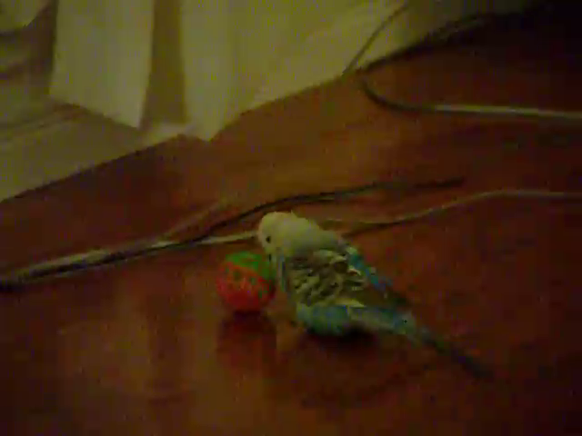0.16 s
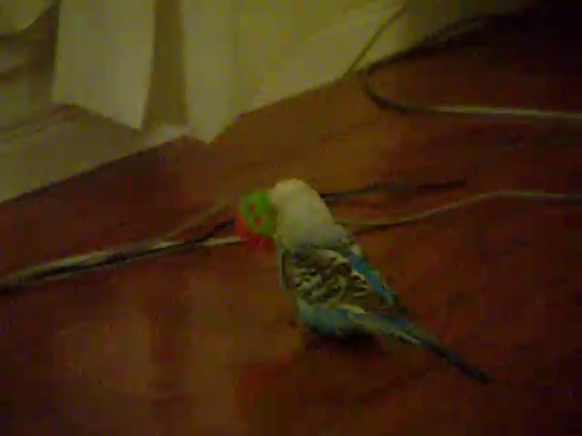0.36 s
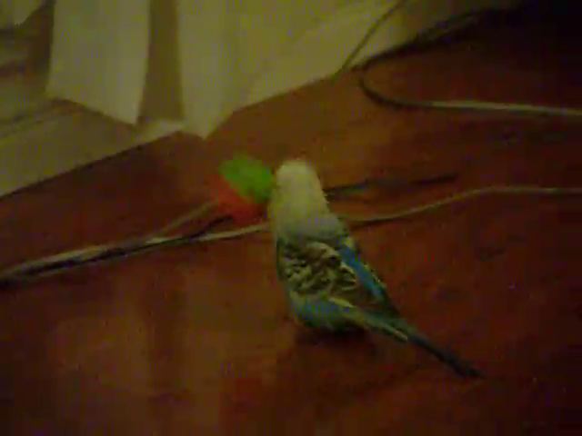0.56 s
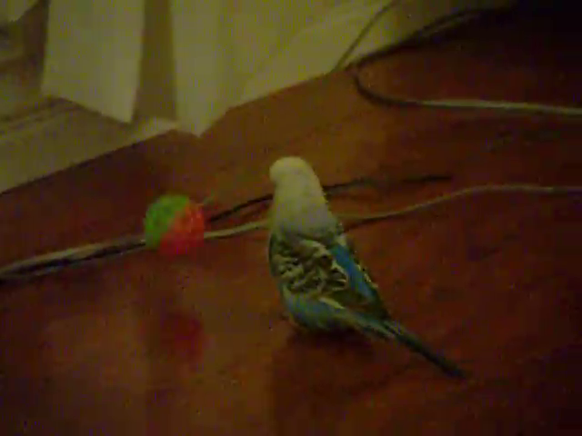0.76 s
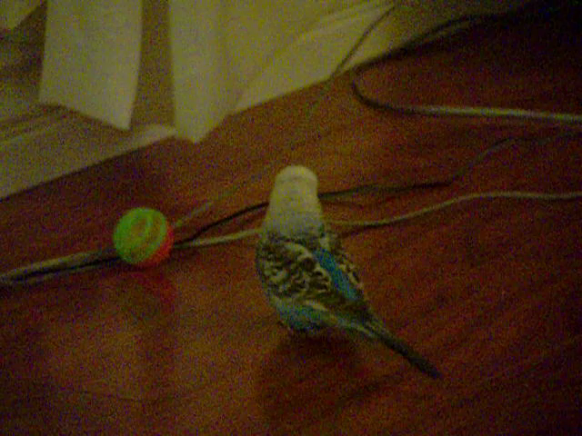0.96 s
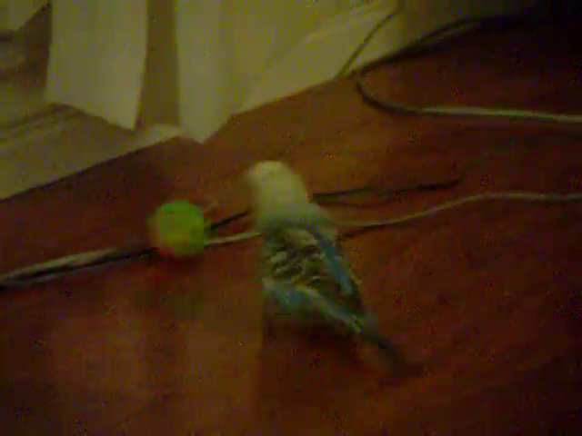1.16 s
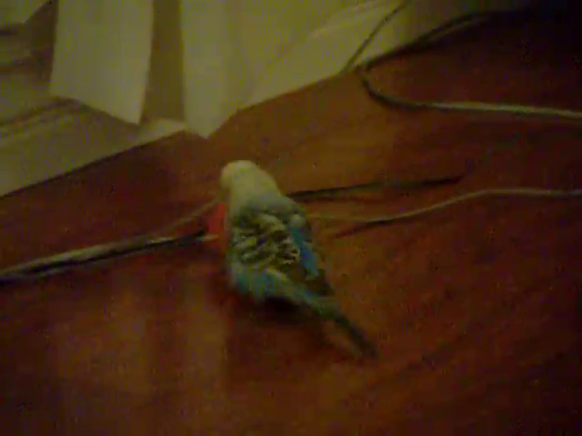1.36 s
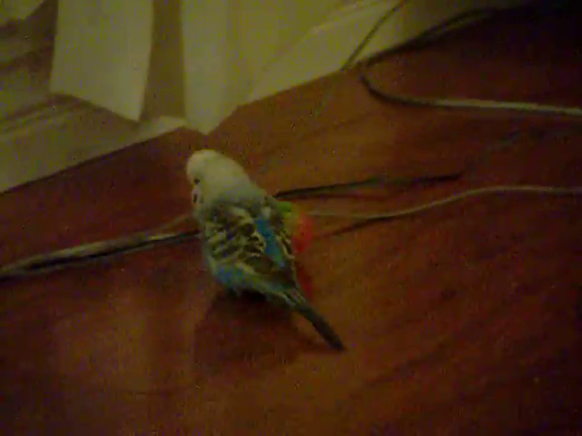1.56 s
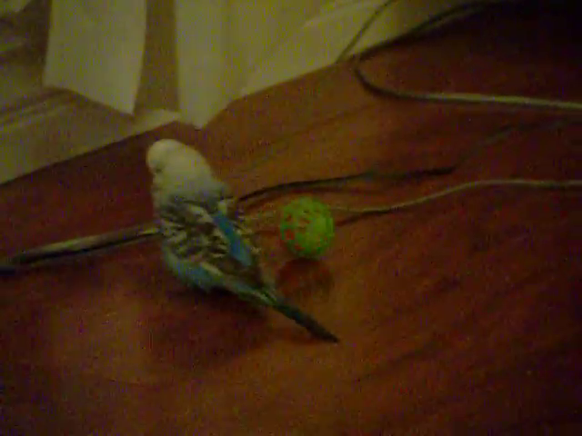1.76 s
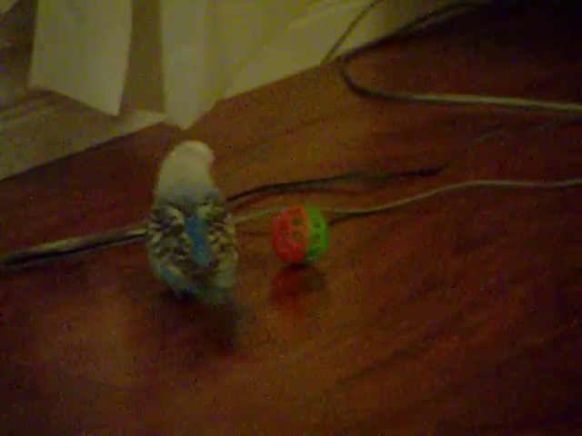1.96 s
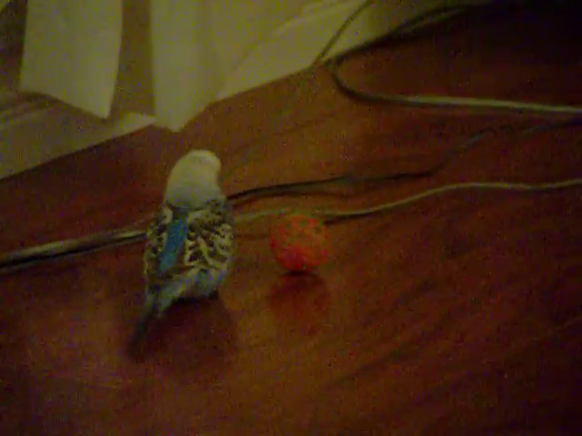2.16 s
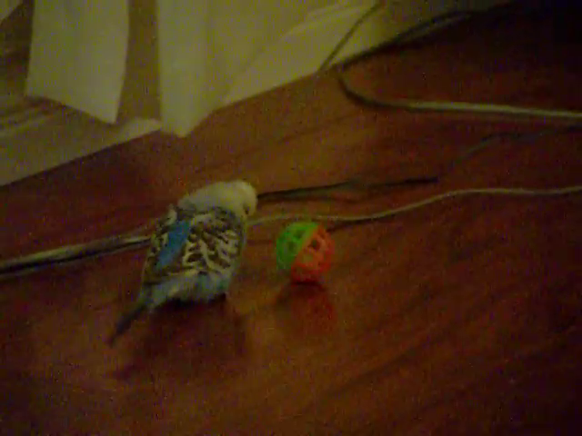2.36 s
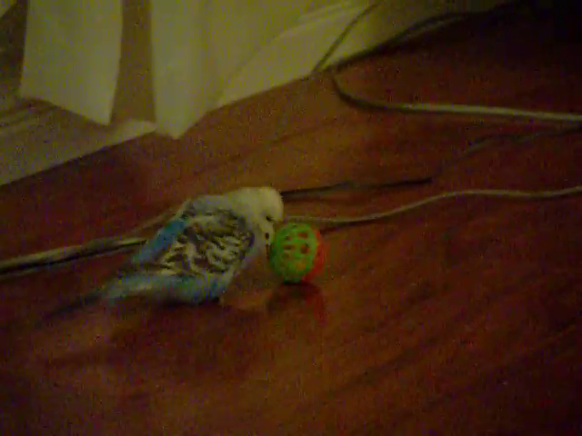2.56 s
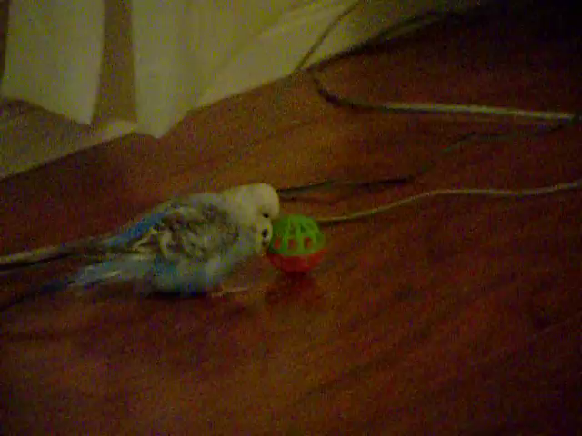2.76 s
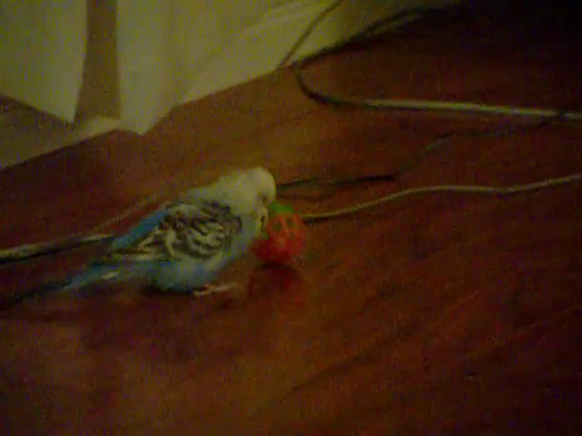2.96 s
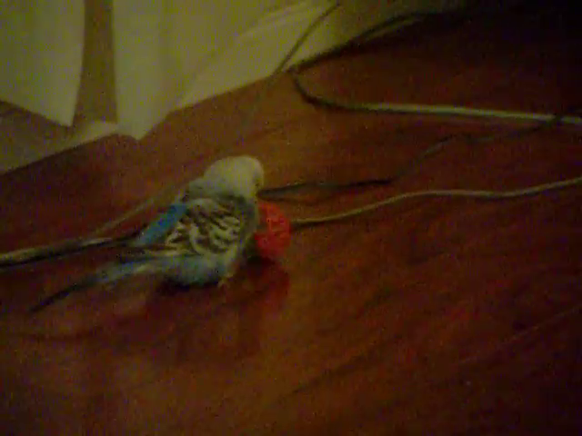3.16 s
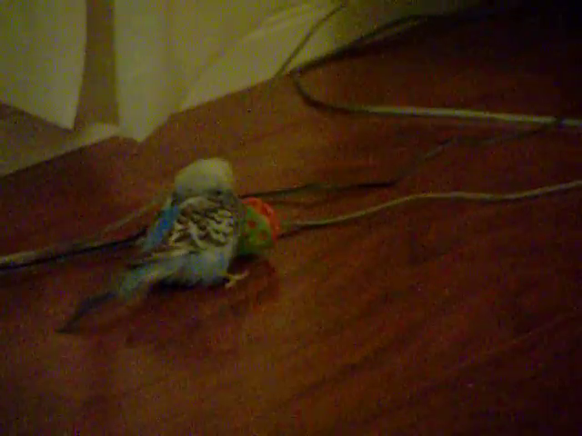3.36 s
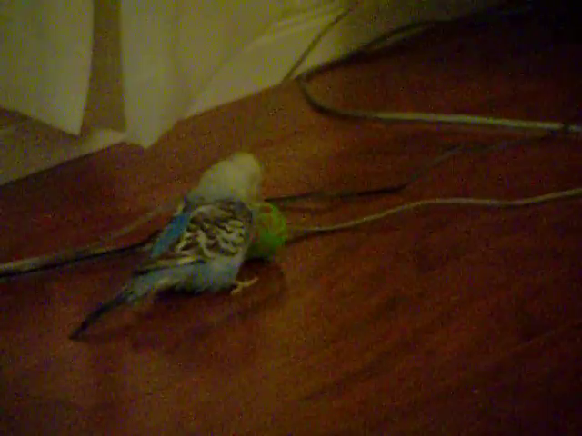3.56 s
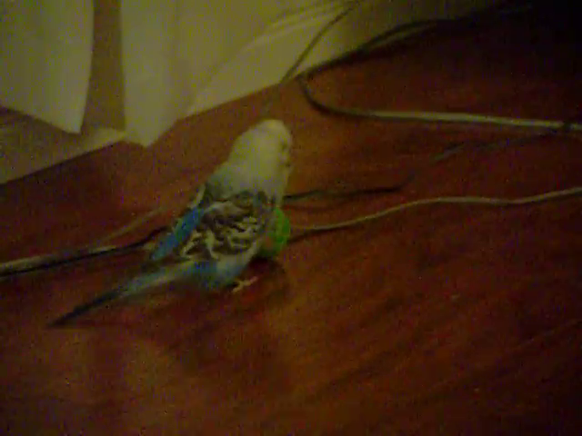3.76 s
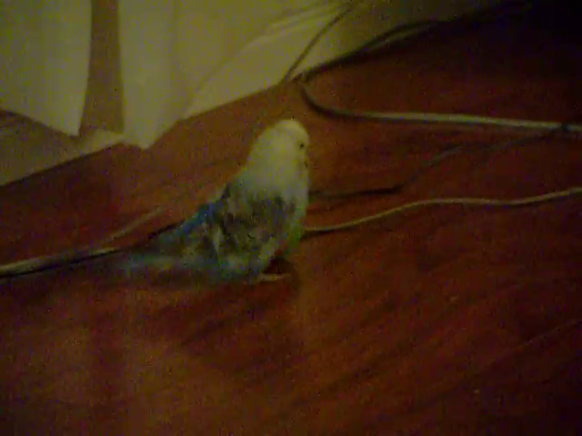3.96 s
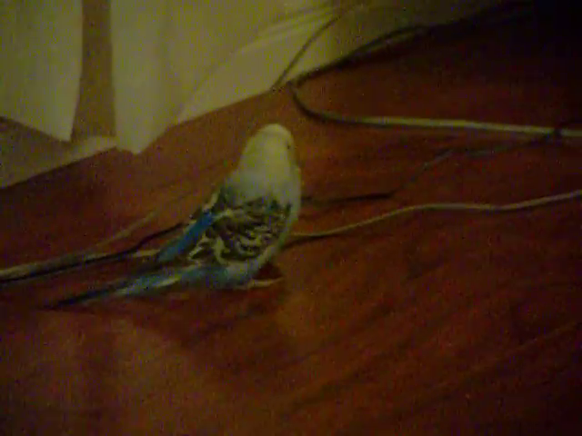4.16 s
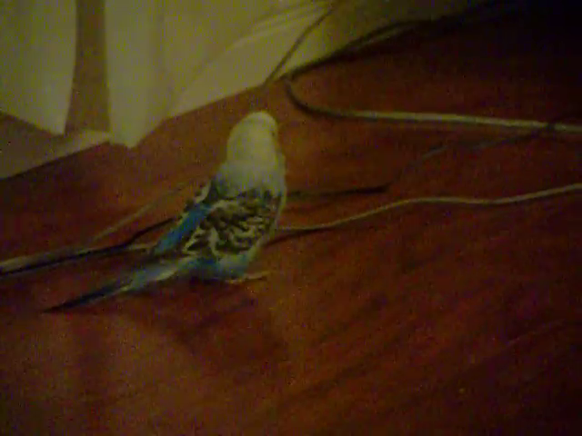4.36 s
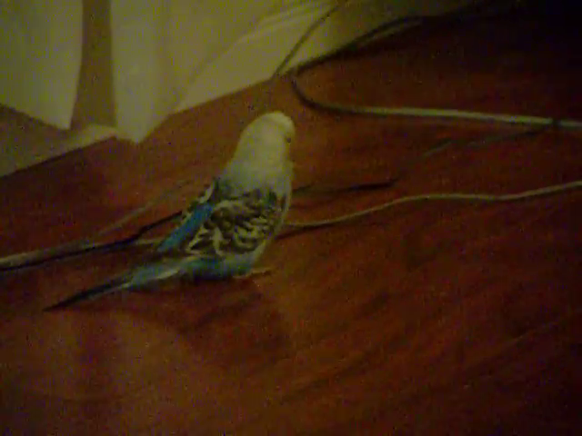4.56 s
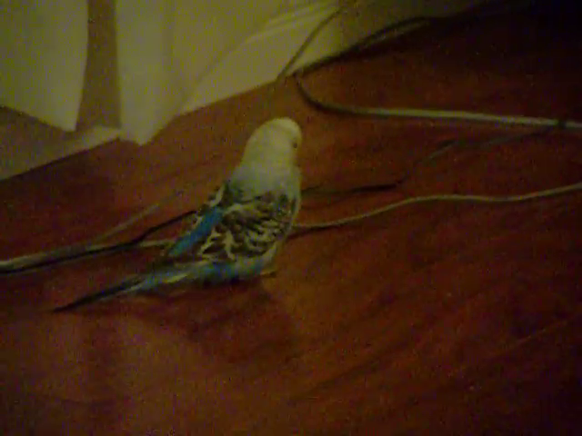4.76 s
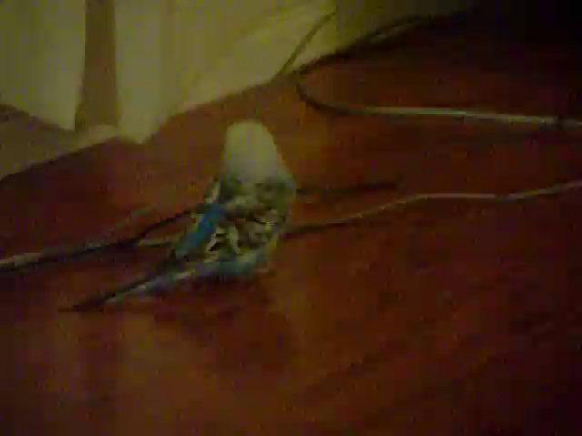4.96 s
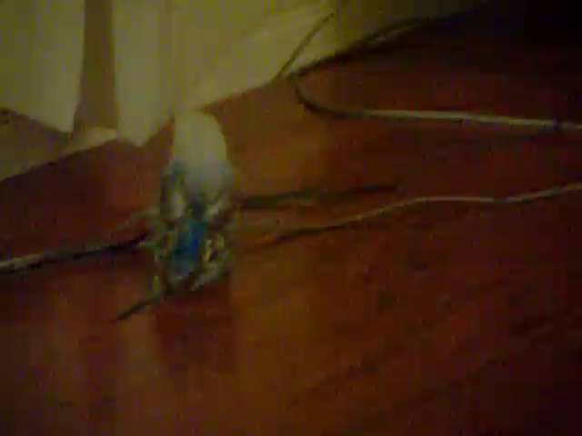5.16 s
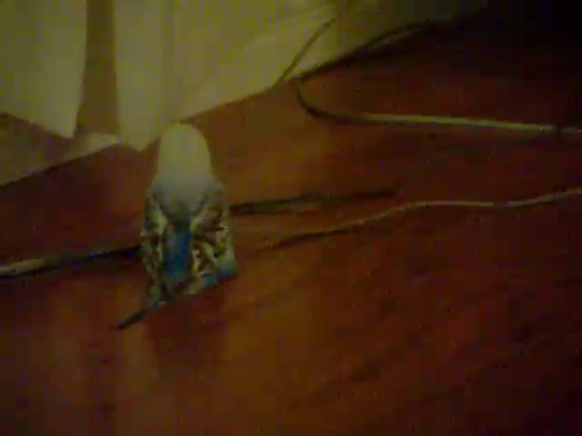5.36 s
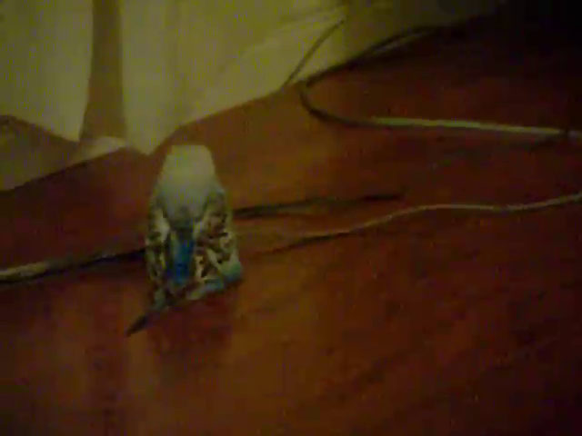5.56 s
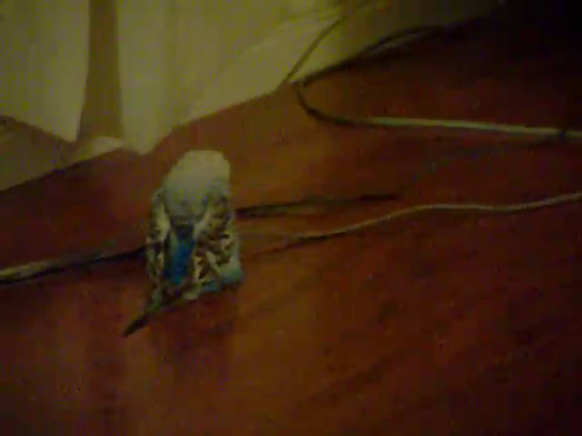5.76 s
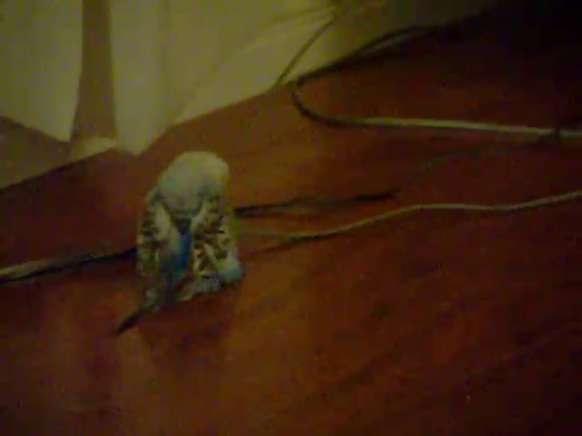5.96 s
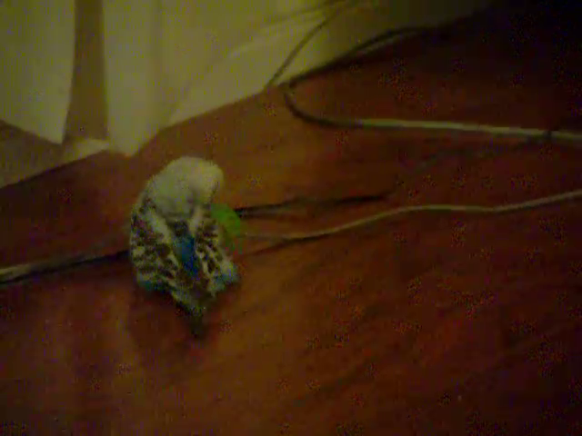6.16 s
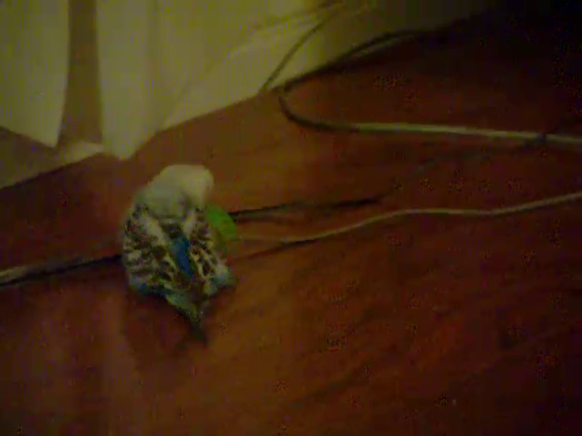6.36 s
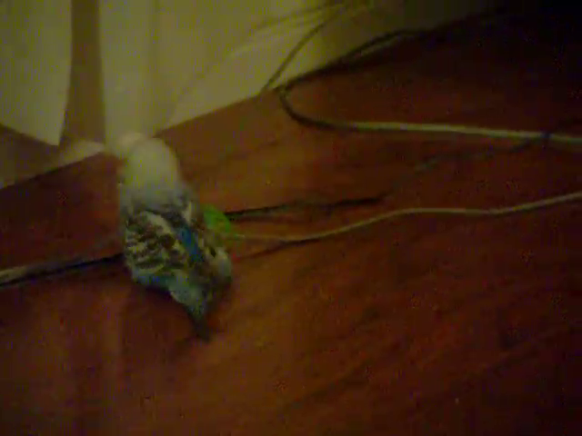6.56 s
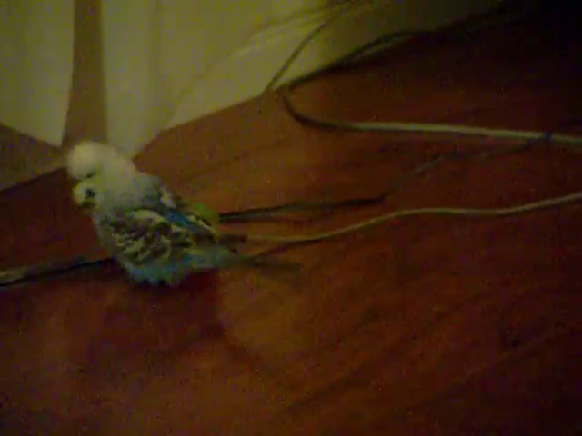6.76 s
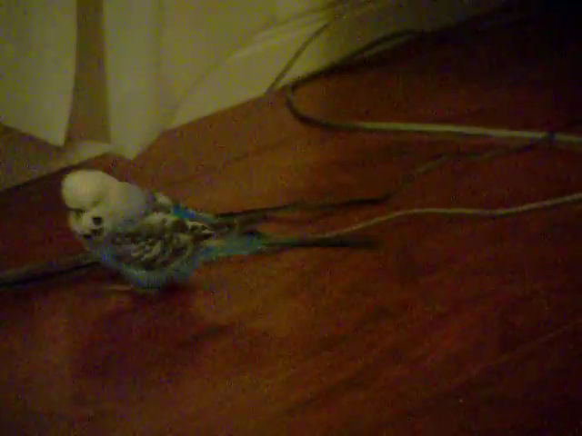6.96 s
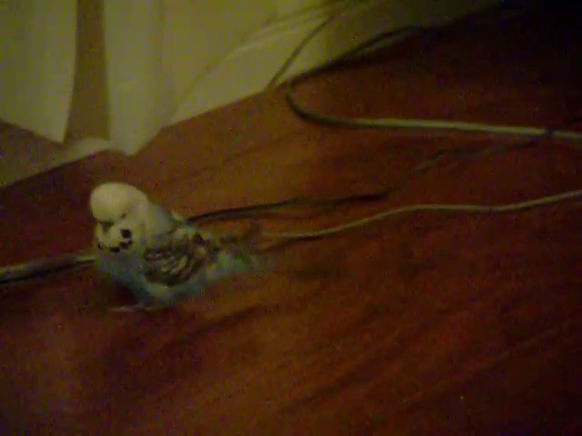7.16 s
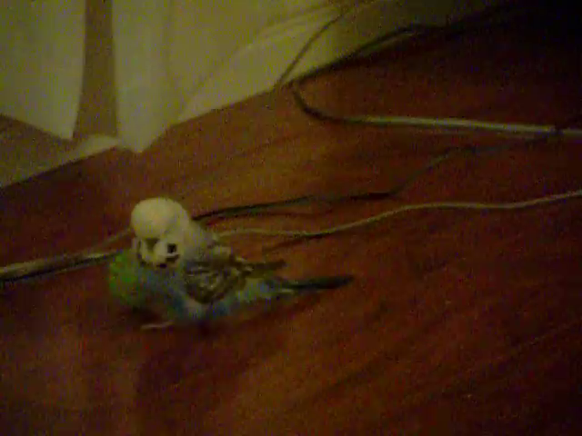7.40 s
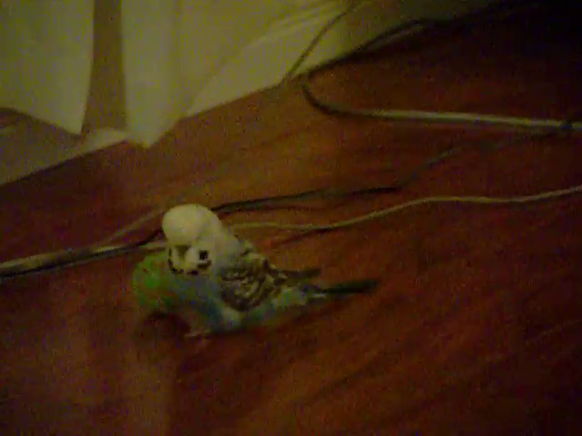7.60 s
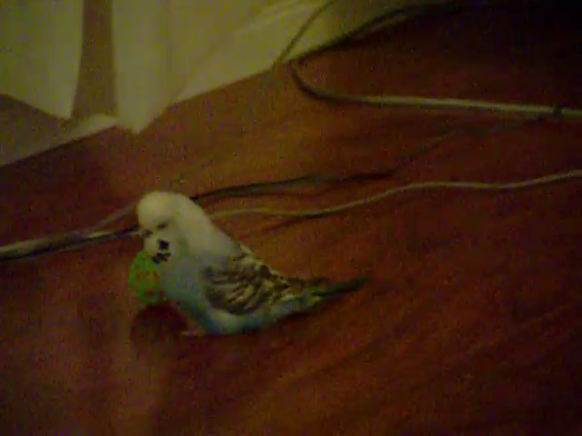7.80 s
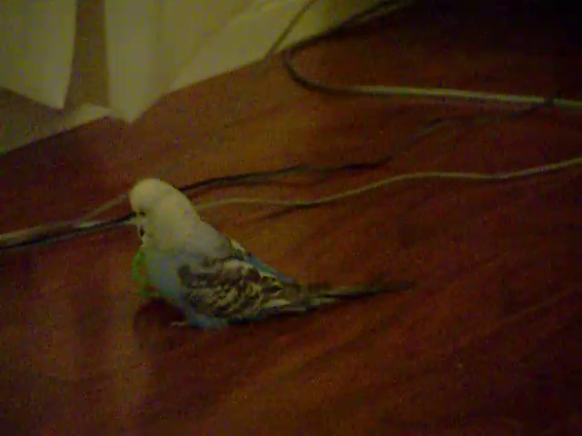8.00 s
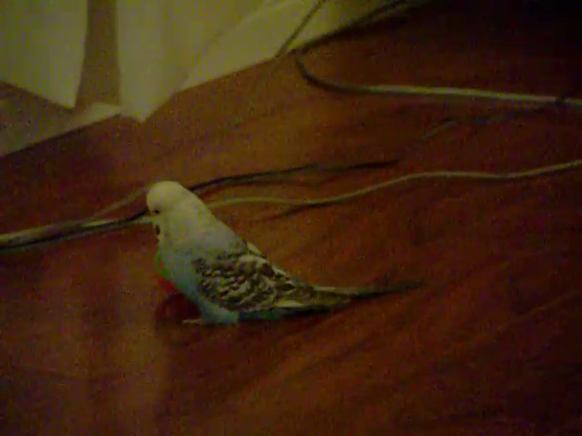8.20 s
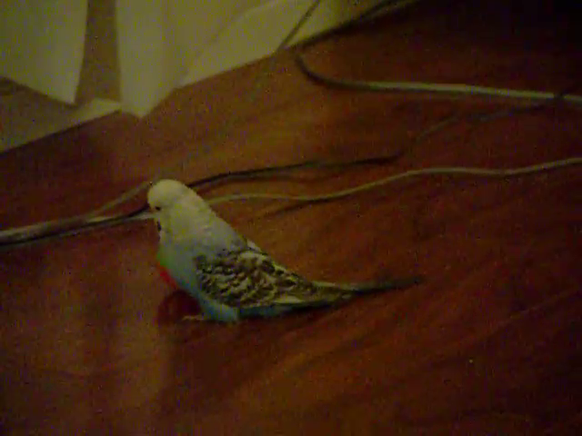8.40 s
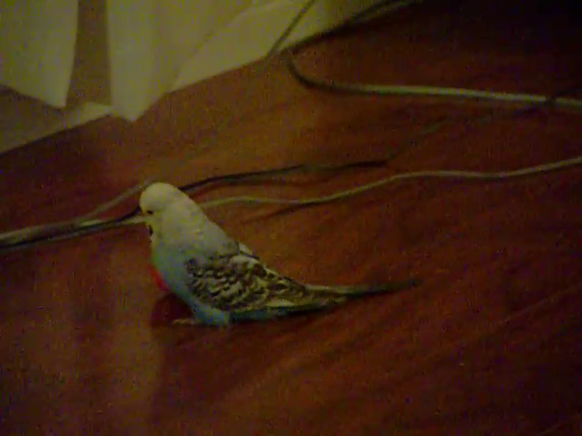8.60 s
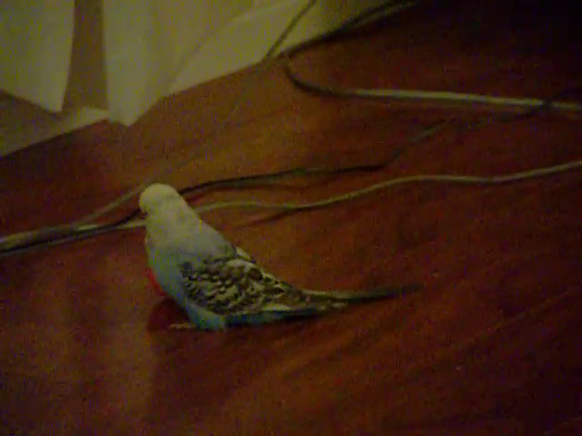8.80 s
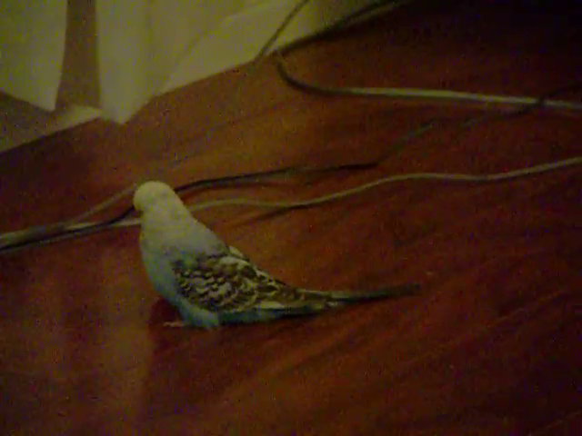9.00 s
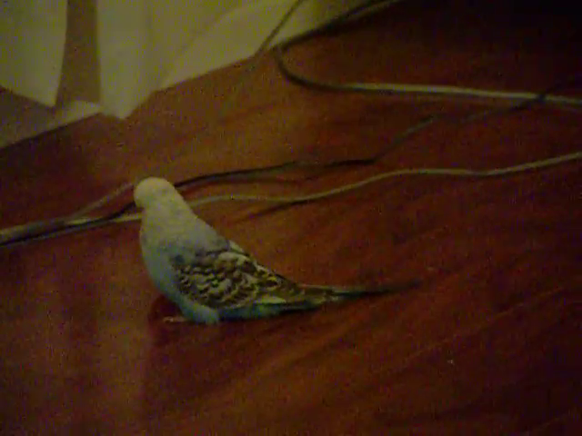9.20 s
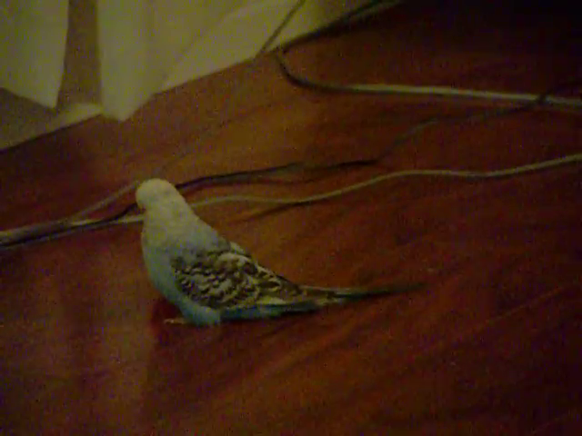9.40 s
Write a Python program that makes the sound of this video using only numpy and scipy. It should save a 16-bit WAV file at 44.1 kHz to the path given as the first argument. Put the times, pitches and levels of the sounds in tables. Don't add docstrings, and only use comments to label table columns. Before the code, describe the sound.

A budgerigar plays with a plastic lattice ball holding a tiny steel bell on a hard floor in a bare room. Claws tick, the beak pecks, the ball drops with a crack and jingles brightly. A short squawk, faint rocking tinkles and one overloaded whistle follow, then a longer busy rattle that stops. A cheap, muffled-top camera microphone hisses and whines throughout; a distant engine hum rises at the end.

```python
import sys
import numpy as np
from scipy import signal
from scipy.fft import rfft, irfft, next_fast_len
from scipy.io import wavfile
from scipy.ndimage import uniform_filter1d, minimum_filter1d, map_coordinates

SR = 44100
rng = np.random.default_rng(int(sys.argv[2]) if len(sys.argv) > 2 else 0)


def store_wav(level_fs):
    pcm = np.round(np.clip(np.atleast_2d(level_fs), -1, 1) * 32767)
    wavfile.write(sys.argv[1], SR, pcm.T.astype(np.int16))


def volts_from_decibels(level):
    exponent = np.asarray(level, float) / 20
    return 10 ** exponent


N = 416304

# (frequency [Hz], level [dB])
MIC = [(100, 0), (7000, 0), (8000, -4), (8500, -12), (8900, -30), (9300, -60), (9500, -120)]
# (low bell modes against high [dB], scuffing against shaking [dB], shaking as [(time [s], level [dB]), ..])
SPELLS = [
    (12, -2, [(0.33, -59), (0.58, -49), (0.7, -71)]),
    (4.5, -4.5, [(0.78, -45), (0.97, -40), (1.11, -48), (1.41, -47.5), (1.7, -59.5)]),
    (2, -1.5, [(2.5, -55), (2.77, -71), (2.9, -45)]),
    (3, 0, [(3.88, -66), (4.15, -60), (4.43, -54), (4.7, -91)]),
    (0.5, -3, [(4.83, -76), (4.97, -56), (5.26, -52.5), (5.54, -62.5), (5.69, -53), (5.83, -55)]),
    (4, -2.5, [(6.78, -57), (7.07, -49.5), (7.21, -43.5), (7.36, -50), (7.5, -47), (7.79, -55.5), (7.93, -42.5)]),
    (-11, -20, [(7.93, -42), (8.07, -51), (8.22, -43.5), (8.36, -55.5), (8.65, -62)]),
]


def along(points, hz):
    f, v = np.transpose(points)
    return np.interp(np.log(hz + 1), np.log(f + 1), v)


def unit(x):
    return x / np.sqrt(np.mean(x ** 2) + 1e-20)


def wobble(rate, size=N):
    knots = rng.standard_normal(int(size * rate / SR) + 4)
    return map_coordinates(knots, [np.arange(size) * rate / SR])


def filtered(x, response):
    m = next_fast_len(x.shape[-1] + SR)
    return irfft(rfft(x, m) * response(np.fft.rfftfreq(m, 1 / SR)), m)[..., :x.shape[-1]]


def laid(times, rows):
    at = np.round(np.asarray(times) * SR).astype(int)[:, None] + np.arange(rows.shape[1])
    return np.bincount(at.ravel(), rows.ravel(), N + SR)[:N]


def hiss():
    # (frequency [Hz], level [dB per Hz])
    spectrum = [(12, -29.5), (20, 7), (103, 1.5), (373, -9), (508, -11), (849, -12.5), (966, -16),
                (1040, -12), (1460, -16.5), (1880, -17), (2030, -18.5), (4990, -22), (7530, -23),
                (8560, -40), (9250, -74), (12000, -85.5), (20400, -120)]
    noise = filtered(rng.standard_normal(N), lambda f: volts_from_decibels(along(spectrum, f) - along(MIC, f).clip(-40)))
    return volts_from_decibels(-48 + 0.5 * wobble(3)) * unit(noise)


def whine():
    # (frequency [Hz], level [dB])
    tones = [(963.8, -63), (1927.6, -74.5), (4819, -73.5), (7710.4, -76.5), (8290, -76)]
    t = np.arange(N) / SR
    return sum(volts_from_decibels(db + 3.5 + 1.1 * wobble(9.6)) * np.sin(2 * np.pi * hz * t + 0.12 * wobble(1.7))
               for hz, db in tones)


def engine():
    # (time [s], pitch [Hz], level [dB])
    drone = [
        (6.5, 85.0, -75),
        (6.89, 83.05, -66),
        (9.44, 88.7, -45),
    ]
    s, hz, db = np.transpose(drone)
    t = np.arange(N) / SR
    level_db = np.interp(t, s, db, left=-90)
    phase = 2 * np.pi * np.cumsum(np.interp(t, s, hz)) / SR
    hum = volts_from_decibels(level_db + 5.5 + 0.92 * wobble(7.9)) * np.sin(phase + 0.52 * wobble(1.7))
    roar = unit(filtered(rng.standard_normal(N), lambda f: f / 200 / (1 + (f / 300) ** 3)))
    return hum + volts_from_decibels(level_db - 8) * roar


def room(x, wet_db, early_db):
    # (frequency [Hz], time [s])
    fading = [(200, 0.53), (1500, 0.4), (5000, 0.42), (9000, 0.23)]
    # (delay [s], level [dB])
    walls = [(.0065, -4), (0.011, -27.5), (0.033, -17)]
    near = x + sum(volts_from_decibels(db + early_db) * np.pad(x, (round(s * SR), 0))[:N] for s, db in walls)
    step = SR // 4
    blocks = np.pad(x, (0, -N % step)).reshape(-1, step)
    hz, t, z = signal.stft(rng.standard_normal((len(blocks), SR // 2)), SR, nperseg=256)
    decay = volts_from_decibels(-60 * t / along(fading, hz)[:, None])
    build_up = 1 - np.exp(-t / 0.0019)
    tails = signal.istft(z * decay * build_up, SR, nperseg=256)[1]
    tails = tails / np.linalg.norm(tails, axis=1, keepdims=True)
    starts = np.arange(len(blocks)) * step / SR
    return near + volts_from_decibels(wet_db) * laid(starts, signal.fftconvolve(blocks, tails, axes=1))


def scuff():
    s, db = np.transpose([(at, level_db + scuff_db) for _, scuff_db, rows in SPELLS for at, level_db in rows])
    t = np.arange(N) / SR
    moving = sum((t > rows[0][0]) & (t < rows[-1][0]) for *_, rows in SPELLS)
    moving = uniform_filter1d(np.clip(moving, 0, 1.), 800)
    grains = rng.standard_normal(N) * (rng.random(N) < 0.03) * volts_from_decibels(3.5 * wobble(40))
    band = lambda f: f ** 2 / (f ** 2 + 1300 ** 2) / (1 + (f / 4500) ** 2)
    return volts_from_decibels(np.interp(t, s, db) - 6) * moving * unit(filtered(grains, band))


def contacts():
    # (time [s], peak level [dB], centre [Hz])
    steps = [(0.168, -35.5, 3740), (0.187, -50, 3790), (0.2106, -40, 3750), (1.488, -42, 5200),
             (2.419, -38, 2900), (2.5325, -44, 4950), (2.8396, -55, 2200), (3.5069, -39, 3000),
             (3.7077, -40, 4400), (3.8443, -41, 2030), (4.054, -43, 4030), (4.1494, -48, 4650),
             (4.5039, -38.5, 2420), (4.8348, -43, 2280), (4.9903, -38.5, 4400), (5.0683, -38, 2930),
             (5.1844, -40, 2760), (5.212, -40, 2320), (5.31, -41, 4700), (5.021, -44, 3430),
             (5.2846, -38, 2420), (5.482, -39, 3440), (6.159, -43, 2900), (6.328, -45.5, 5150),
             (6.6502, -43.5, 2150), (8.657, -42, 1810), (8.8061, -39.5, 4400), (8.8398, -46, 4280),
             (9.27, -39, 4400)]
    # (time [s], peak level [dB], centre [Hz])
    knocks = [(0.4359, -37, 4860), (0.5244, -31.5, 4700), (0.539, -35, 4300), (1.0214, -29.5, 4150),
              (1.225, -31.5, 2920), (1.2847, -31, 2350), (1.04, -31.5, 2620), (1.4158, -33.5, 3500),
              (2.6184, -32.5, 2130), (2.838, -40, 4950), (7.139, -37.5, 1900), (7.19, -34, 2870),
              (7.9403, -30, 2560), (8.094, -35.5, 5080), (2.7574, -34, 4900), (2.756, -38.5, 2520),
              (7.1385, -39, 3280), (7.366, -37, 4000), (7.573, -32.5, 5300), (7.7448, -35, 2900),
              (7.754, -31, 4870), (7.8316, -32.5, 5360), (8.034, -36, 5160), (8.1737, -35.5, 6200)]
    # (time [s], peak level
    # [dB], centre [Hz], bandwidth [octaves])
    pecks = [(0.326, -39.5, 4840, 0.72), (1.0886, -27, 5200, 0.88), (1.977, -34, 4400, 0.45),
             (2.0445, -27, 3030, 1), (2.589, -31, 4620, 1.1), (2.7922, -31.5, 2450, 0.66),
             (3.2221, -22, 4030, 0.25), (3.227, -32, 4150, 0.28), (3.2226, -32, 2420, 0.46),
             (4.4186, -33.5, 5450, 1.2), (5.6314, -34, 2790, 0.85), (6.884, -34, 3200, 0.27),
             (6.9648, -36.5, 2870, 0.27), (7.079, -34, 3960, 0.45), (7.941, -21, 6240, 0.88),
             (2.7923, -30, 5000, 1), (2.582, -34, 2570, 1.5), (7.962, -34, 5000, 1.2),
             (7.972, -31, 6600, 1.2), (7.983, -30, 6050, 1.1), (7.994, -35, 5500, 1.3),
             (9.2364, -31.5, 4750, 3.4)]
    # (time [s], peak level [dB], centre [Hz], bandwidth [octaves], thud [dB])
    landings = [
        (0.7725, -23, 3200, 0.35, -5),
        (.774, -29.5, 1400, 1.4, -9.5),
        (0.899, -26.5, 2300, 1.9, -8),
        (0.854, -40, 710, 0.45, -16),
    ]
    rows = [(s, db, hz, -15.5, 0.69) for s, db, hz in steps]
    rows += [(s, db, hz, -13.5, 0.74) for s, db, hz in knocks]
    rows += [(s, db, hz, -30, octaves) for s, db, hz, octaves in pecks]
    rows += [(s, db, hz, thud_db, octaves) for s, db, hz, octaves, thud_db in landings]
    return rows


def clicks():
    # (frequency [Hz], width [Hz], level [dB])
    resonances = [(171, 42, -2.5), (413, 5.5, -5), (690, 62, -10.5), (950, 51, -2.5), (1180, 35, -4),
                  (1330, 21, -10)]
    s, db, hz, thud_db, octaves = np.transpose(contacts())[:, :, None]
    times = s[:, 0]
    t = np.arange(SR // 10) / SR
    luck = rng.standard_normal((len(s), 2, len(t)))

    f = np.fft.rfftfreq(len(t), 1 / SR) + 1
    width = hz * np.clip(octaves, 0.05, 3) * 1.55
    band = (1j * f * width / (hz * hz - f * f + 1j * f * width)) ** 2
    snap = 4 * volts_from_decibels(-60 * t / 0.0018) * np.cos(2 * np.pi * hz * t)
    shape = volts_from_decibels(-60 * t / 0.012) * (1 - np.exp(-t / 0.00096))
    burst = irfft(rfft((luck[:, 0] + snap) * shape) * band, len(t))
    burst = burst / np.abs(burst).max(axis=1, keepdims=True)

    def boards(f):
        slope = (f / 200) / np.sqrt(1 + (f / 200) ** 2) / (1 + (f / 1100) ** 2)
        peaks = sum(volts_from_decibels(peak_db) / (1 + ((f - c) / (w + 20)) ** 2) for c, w, peak_db in resonances)
        return volts_from_decibels(12) * slope * (0.79 + peaks)

    thud = volts_from_decibels(db + thud_db - 60 * t / 0.09) * luck[:, 1]
    return laid(times, volts_from_decibels(db + 2.5) * burst) + filtered(laid(times, thud), boards)


def rung(modes, times, blow_db, scatter_db, favoured_hz, hz_per_db=20, most_db=17):
    out, at = np.zeros(N), np.round(times * SR).astype(int)
    damping = volts_from_decibels(2.5 * wobble(70))
    sizes = rng.standard_normal((len(times), len(modes), 2))
    for k, (hz, db, t60) in enumerate(modes):
        miss_db = np.clip(np.abs(favoured_hz - hz) / hz_per_db, 0, most_db)
        size = volts_from_decibels(blow_db + db - miss_db + scatter_db * sizes[:, k, 0])
        blows = np.bincount(at, size * np.sign(sizes[:, k, 1]), N)[:N]
        r = volts_from_decibels(-60 / (t60 * SR))
        w = 2 * np.pi * hz / SR
        ringing = signal.lfilter([0, np.sin(w)], [1, -2 * r * np.cos(w), r * r], blows)
        out += np.roll(damping, k * SR // 3) * ringing
    return out


def patter_blows():
    times, high, low = [], [], []
    for low_db, _, rows in SPELLS:
        at, level_db = np.transpose(rows)
        life = at[-1] - at[0]
        luck = rng.random((int(life * 110), 2))
        when = at[0] + luck[:, 0] * life
        size_db = np.interp(when, at, level_db) - 3 * np.log(luck[:, 1] + 0.01)
        times.append(when)
        high.append(size_db)
        low.append(size_db + low_db)
    return np.concatenate(times), np.concatenate(high), np.concatenate(low)


def bell():
    # (frequency [Hz], level [dB], time to fade 60 dB [s])
    high_modes = [(7360, -9.5, 0.064), (7550, -1, 0.079), (7620, -5.5, 0.092), (7920, 4.5, 0.027),
                  (8060, 1, 0.052), (8460, -0.5, 0.077), (6200, -28, 0.081)]
    low_modes = [(2908, -3.5, 0.04), (3470, -12.5, 0.14), (4150, -5, 0.054), (4300, -6, 0.1),
                 (4760, -11.5, 0.12), (4660, -6.5, 0.059), (5200, -6, 0.093), (5290, -11, 0.054)]
    # (time [s], peak level [dB],
    # favoured mode [Hz])
    lip_strikes = [(0.7963, -26, 7550), (0.8281, -23.5, 5200), (0.8321, -27, 8100), (.851, -22, 7900),
                   (0.909, -24, 7550), (0.925, -27, 4300), (1.012, -40, 7950), (1.056, -28, 7550),
                   (1.094, -34, 8100), (1.1943, -36, 7800), (1.229, -36, 4600), (1.27, -40, 4660),
                   (1.2845, -31, 7550), (1.315, -35, 7550), (1.332, -29.5, 7780), (1.49, -30, 7550),
                   (1.4969, -38, 7550), (6.8913, -50, 7550), (6.9337, -40, 7900), (6.972, -27, 8070),
                   (7.033, -47.5, 4760), (7.1, -33, 8070), (7.112, -32.5, 7950), (7.3, -37, 8070),
                   (7.1457, -29, 7550), (7.1685, -22.5, 7550), (7.232, -29, 7550), (7.3803, -47, 7550),
                   (7.3906, -41, 5200), (7.441, -41.5, 8000), (7.4767, -42, 7550), (7.505, -33, 7550),
                   (7.544, -38.5, 2908), (7.5724, -30.5, 8040), (7.636, -37, 5200), (7.656, -36, 8200),
                   (7.7088, -31, 8100), (7.8324, -29.5, 7990), (7.8625, -38, 7550), (7.9208, -40, 4760),
                   (8.0348, -31, 7550), (8.105, -33, 7900), (8.131, -33, 7550), (8.1713, -42, 8030),
                   (8.228, -36, 7550), (8.2916, -39, 7900), (8.321, -36.5, 7550),
                   (3.9045, -45, 7900), (3.9666, -43.5, 7950), (3.995, -38, 8100), (4.092, -36, 7550),
               (4.139, -41.5, 7550), (4.1813, -38.5, 7550), (4.242, -47, 7550), (4.3622, -48, 7550),
               (4.396, -45, 4300), (4.4813, -36.5, 7860), (4.5097, -40.5, 7950), (4.5457, -47, 7950),
               (4.585, -50, 7950), (4.8445, -43, 7950), (4.9079, -58, 4300), (4.972, -42, 7900),
               (5.04, -42, 7550), (5.0618, -40.5, 8060), (5.13, -45, 7550), (5.187, -45, 7550),
               (5.229, -41.5, 7550), (5.262, -41.5, 7860), (5.31, -44, 8100), (5.3544, -39, 7550),
               (5.426, -37, 7550), (5.479, -41, 7950), (5.601, -51, 4760), (5.622, -39, 7550),
               (5.668, -49, 7950), (5.737, -44.5, 8230), (5.842, -54.5, 4300)]
    # (time [s], peak level [dB], favoured low mode [Hz])
    body_strikes = [(0.5016, -42, 5290), (0.7745, -16.5, 4660), (0.781, -20.5, 4150), (0.777, -26, 2908),
                    (.787, -25, 5200), (.815, -23.5, 4150), (0.8328, -27, 4660), (.86, -22, 4660),
                    (.91, -32.5, 2908), (.94, -29, 3470), (0.994, -23.5, 3470), (1.022, -32, 4300),
                    (1.02, -24, 3470), (1.05, -30, 3470), (1.155, -37, 3470), (1.235, -31.5, 4660),
                    (4.0293, -49, 4300), (4.0642, -42, 4150), (4.148, -46, 4300), (4.175, -45, 3470),
                    (4.4249, -43, 4760), (6.89, -31, 3470), (6.892, -48, 4300), (6.975, -39, 3470),
                    (7.02, -40, 3470), (7.055, -40, 4300), (7.0825, -36, 4300), (7.096, -39, 4150),
                    (7.078, -32, 3470), (7.0998, -35, 3470), (7.15, -40, 3470), (7.164, -31.5, 3470),
                    (7.2, -37, 3470), (7.27, -49, 4300), (7.2999, -33, 3470), (7.41, -40, 2908),
                    (7.44, -48, 2908), (7.553, -39, 2908), (7.58, -34.5, 2908), (7.603, -36.5, 2908),
                    (7.62, -41, 3470), (7.69, -33, 3470), (7.715, -33, 3470), (7.7533, -34, 3470),
                    (7.78, -48, 4300), (7.835, -51, 2908), (7.91, -49, 2908), (8.06, -47, 2908)]
    # (time [s], peak level [dB])
    shell_ticks = [(0.7734, -19), (0.8264, -24), (0.8312, -26), (0.9085, -24), (0.946, -27), (0.9939, -27),
                   (1.0113, -31), (1.02, -32), (1.0921, -39), (1.1939, -44), (1.2264, -36), (1.2483, -44),
                   (1.2692, -33), (1.2855, -35), (1.308, -33), (1.3301, -36), (1.455, -49), (1.4892, -40),
                   (1.4977, -38),
                   (6.8853, -44), (6.9337, -47), (6.9711, -35), (7.0305, -34), (7.0559, -44), (7.0804, -40),
                  (7.1078, -31), (7.1517, -36), (7.1692, -35), (7.26, -43), (7.2994, -40), (7.3642, -48),
                  (7.3917, -37), (7.4411, -38), (7.4765, -45), (7.4959, -39), (7.5054, -38), (7.5718, -39),
                  (7.5947, -41), (7.6361, -39), (7.6556, -31), (7.6925, -34), (7.7089, -37), (7.7538, -31),
                  (7.8317, -38), (7.921, -39), (7.9407, -22), (7.971, -35), (8.0337, -34), (8.0784, -32),
                  (8.0911, -31), (8.1734, -41), (8.2911, -38)]

    def lips(at, db, hz, scatter_db):
        return rung(high_modes, at, db + 7 * (hz < 7000), scatter_db, hz, hz_per_db=30, most_db=9)

    # low modes against high ones, dB
    strikes = [(s, db, -5.5, hz) for s, db, hz in lip_strikes]
    strikes += [(s, db, 14, hz) for s, db, hz in body_strikes]
    s, db, low_db, hz = np.transpose(sorted(strikes))
    all_hz = np.array([*low_modes, *high_modes])[:, 0]
    hz = all_hz[np.abs(hz[:, None] - all_hz).argmin(axis=1)]
    clear = lips(s, db - 10 - 0.7 * low_db, hz, scatter_db=1.6)
    clear += rung(low_modes, s, db + low_db - 15, scatter_db=1.5, favoured_hz=hz)

    times, high, low = patter_blows()
    body = hz < 7000
    last = np.clip(np.searchsorted(s[body], times) - 1, 0, None)
    spot_hz = hz[body][last]
    patter = lips(times, high - 20, spot_hz, scatter_db=8)
    patter += rung(low_modes, times, low - 15, scatter_db=3.5, favoured_hz=spot_hz)

    t = np.arange(SR // 200) / SR

    def tick(at, db):
        return laid(at, volts_from_decibels(db[:, None] - 60 * t / 0.0071) * rng.standard_normal((len(at), len(t))))

    tick_s, tick_db = np.transpose(shell_ticks)
    ticks = tick(s, db + 1 - 0.17 * low_db) + tick(times, high + 6) + tick(tick_s, tick_db + 5.5)
    return clear + patter + filtered(ticks, lambda f: f ** 4 / (f ** 4 + 4200 ** 4))


def notes():
    # (time [s], first pitch [Hz], last pitch [Hz], length [s], level [dB])
    pips = [(1.66, 3620, 3560, 0.01, -50.5), (1.7, 2700, 2680, 0.019, -52),
            (1.759, 3530, 4300, 0.027, -53.5), (1.784, 3570, 3280, 0.018, -50.5),
            (1.8, 2670, 2650, 0.017, -51), (1.827, 3550, 3420, 0.021, -55), (1.866, 2430, 2490, .03, -57.5),
            (3.365, 1970, 2760, 0.024, -52), (3.374, 940, 1060, 0.011, -49.5),
            (3.469, 2300, 2350, 0.014, -51.5), (3.491, 3350, 2940, 0.028, -56),
            (3.775, 2800, 2850, 0.04, -47), (3.776, 3830, 3770, 0.033, -52), (5.218, 2200, 2200, .015, -56),
            (5.3, 4800, 4700, 0.034, -50), (5.43, 2740, 2780, 0.026, -57.5),
            (5.478, 3550, 3470, 0.011, -49.5), (5.65, 2560, 2490, 0.011, -48),
            (7.44, 1930, 1950, 0.024, -55), (7.23, 955, 950, 0.16, -56), (7.375, 977, 963, 0.064, -52),
            (7.38, 1960, 1960, 0.022, -53.5)]
    cheeps = [
        (.09, 2610, 2550, 0.045, -56),
        (.102, 2990, 3220, .034, -53),
        (1.952, 2730, 2650, 0.021, -51),
        (2.585, 5000, 4910, 0.037, -42),
        (2.955, 2860, 2780, 0.037, -40),
        (6.862, 1730, 1720, 0.014, -50.5),
        (5.281, 2440, 2400, 0.018, -44),
    ]
    croaks = [
        (2.8, 2395, 2190, 0.057, -51),
        (3.015, 1304, 1040, 0.026, -46),
        (3.775, 965, 920, 0.05, -53.5),
        (5.645, 2010, 1300, 0.042, -55),
        (8.7, 820, 793, 0.032, -53),
        (3.03, 1904, 1254, 0.051, -45),
    ]
    # (overtones [dB], roughness [0-2], [(time [s], pitch [Hz], level [dB]), ..])
    chirp = (-45, 0.045, [(.325, 4420, -50), (.333, 4610, -41), (.343, 4850, -37), (.355, 4590, -34),
             (.372, 4620, -45), (.41, 3530, -58)])
    squawk_upper = (-3, 0.38, [(2.983, 3040, -42), (2.989, 3075, -33), (2.995, 3150, -34),
                    (3.004, 3144, -43), (3.011, 2960, -33), (3.02, 2860, -36), (3.034, 2610, -45)])
    squawk_lower = (10.7, 0.25, [(2.97, 2640, -55), (2.974, 2380, -50), (2.98, 1970, -39),
                    (2.986, 2040, -45), (2.993, 2030, -53)])
    squawk_main = (-26, 0.28, [(2.992, 3465, -34), (2.999, 3927, -25), (3.006, 4150, -31),
                   (3.011, 4156, -31), (3.018, 4000, -24), (3.024, 4180, -27), (3.03, 4030, -40)])
    squawk_rasp = (-16, 1.1, [(2.98, 5000, -46), (3.006, 4980, -40.5), (3.016, 4800, -29),
                   (3.024, 4520, -32), (3.033, 3590, -43), (3.05, 1990, -47)])
    whistle = (-60, .05, [(5.876, 5050, -52), (5.888, 5150, -36), (5.894, 5480, -23), (5.902, 5575, -15),
               (5.918, 5610, -11), (5.936, 5590, -11), (5.948, 5490, -15), (5.965, 5475, -16),
               (5.984, 5480, -19)])
    # (rows, overtones dB, roughness, fading over the note dB)
    kinds = [(pips, -20, 0.26, 1.9), (cheeps, -29, 0.084, 8.7), (croaks, -1.3, 0.52, 8.4)]
    short = [(over_db, rough, [(s, hz, db), (s + life, last_hz, db - fade_db)])
             for rows, over_db, rough, fade_db in kinds for s, hz, last_hz, life, db in rows]
    return [chirp, squawk_upper, squawk_lower, squawk_main, squawk_rasp, whistle] + short


def bird():
    out = np.zeros(N)
    for over_db, rough, rows in notes():
        s, hz, db = np.transpose(rows)
        t = np.arange(s[0], s[-1], 1 / SR)
        rough = np.clip(rough, 0, 2)
        shake = rough * wobble(699, size=len(t))
        flutter = rough * wobble(527, size=len(t))
        phase = 2 * np.pi * np.cumsum(np.interp(t, s, hz) * (1 + 0.15 * shake)) / SR
        overtones = np.sin(2 * phase) + 0.22 * np.sin(3 * phase) + 0.059 * np.sin(4 * phase)
        tone = np.sin(phase) + volts_from_decibels(over_db) * overtones
        edges = np.clip(np.minimum(t - s[0], s[-1] - t) / 0.0025, 0, 1)
        strength = volts_from_decibels(np.interp(t, s, db) + 3) * edges * (1 + 1.5 * flutter)
        out[round(s[0] * SR):][:len(t)] += strength * tone
    return out


def scene():
    background = hiss() + whine() + engine()
    floor = room(scuff() + clicks() + bell(), wet_db=-0.16, early_db=-3)
    voice = room(bird(), wet_db=-6.5, early_db=-8)
    return (background + floor + voice)[None]


def band_limit(x):
    return signal.sosfilt(signal.butter(12, 9400, fs=SR, output="sos"), x)


def record(dry):
    top = np.where(dry > 0, 0.215, 0.175)
    x = dry / (1 + np.abs(dry / top) ** 10) ** (1 / 10)

    overload = np.tanh(uniform_filter1d(np.abs(dry - x), 250) / 0.028)
    sputter = 0.041 * overload * rng.standard_normal(N)

    def sputter_colour(f):
        deep = volts_from_decibels(20) / (1 + (f / 30) ** 2) + volts_from_decibels(10) / (1 + (f / 330) ** 2)
        return deep + volts_from_decibels(-24) + volts_from_decibels(2) / (1 + ((f - 5300) / 1000) ** 2) ** 2

    x = x + filtered(sputter, sputter_colour)

    power = np.abs(uniform_filter1d(x[0] ** 2, SR // 12)) + 1e-12
    over_db = 0.35 * np.clip(10 * np.log10(power) + 29, 0, None)
    hold = round(0.64 * SR)
    held_db = -minimum_filter1d(np.pad(-over_db, (hold, 0)), hold)[hold // 2:][:N]
    duck = volts_from_decibels(-uniform_filter1d(np.pad(held_db, (SR // 8, 0))[:N], SR // 10))
    rumble = filtered(x, lambda f: 1 / (1 + (f / 160) ** 4))
    x = filtered(rumble + duck * (x - rumble), lambda f: volts_from_decibels(along(MIC, f)) * f / (f + 9))
    return band_limit(x)


dry = scene()
out = record(dry)
store_wav(out)
```